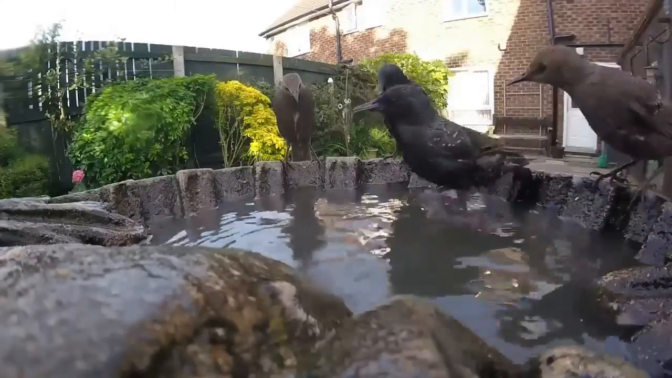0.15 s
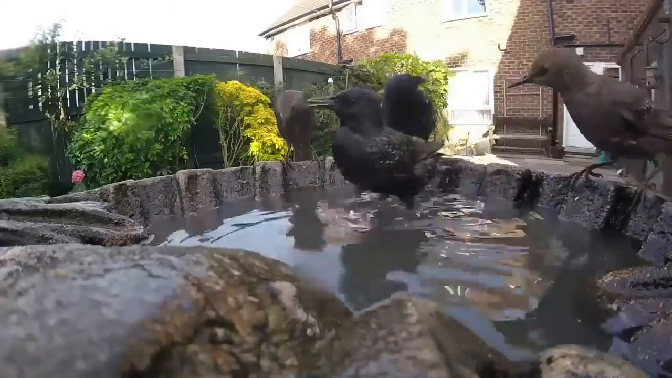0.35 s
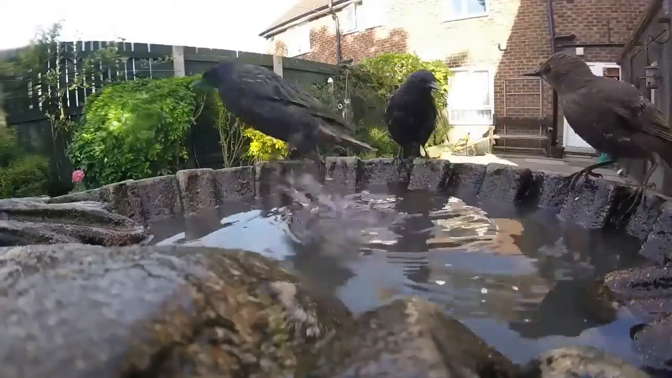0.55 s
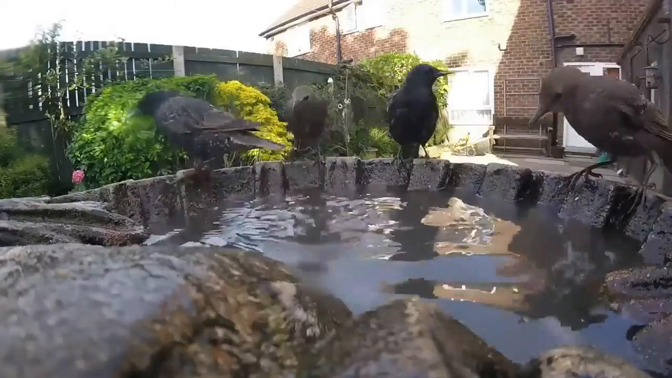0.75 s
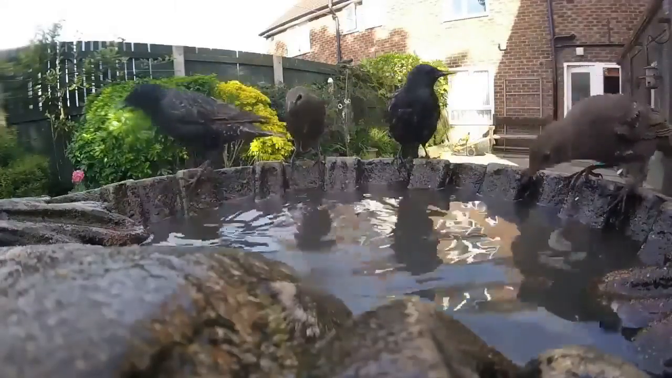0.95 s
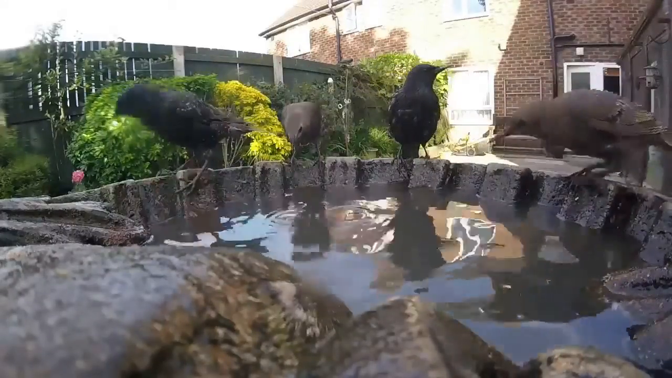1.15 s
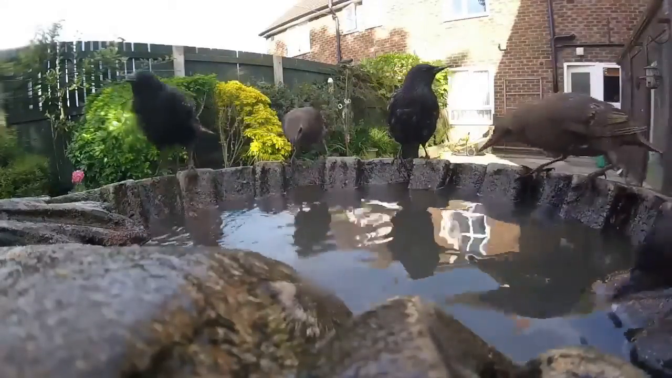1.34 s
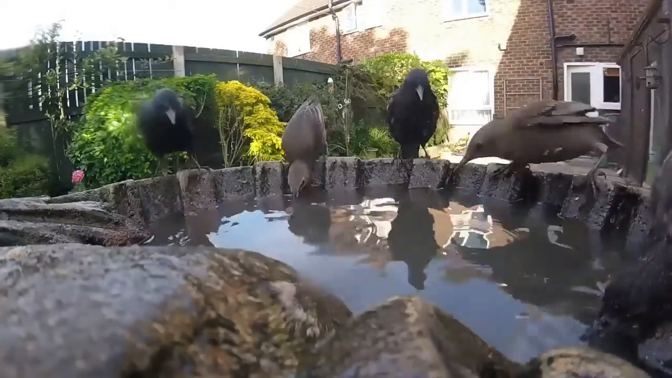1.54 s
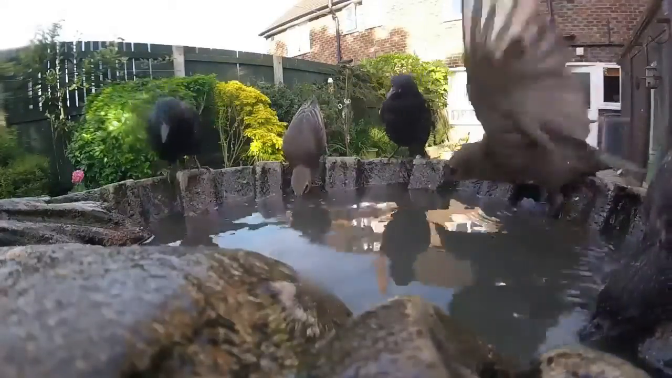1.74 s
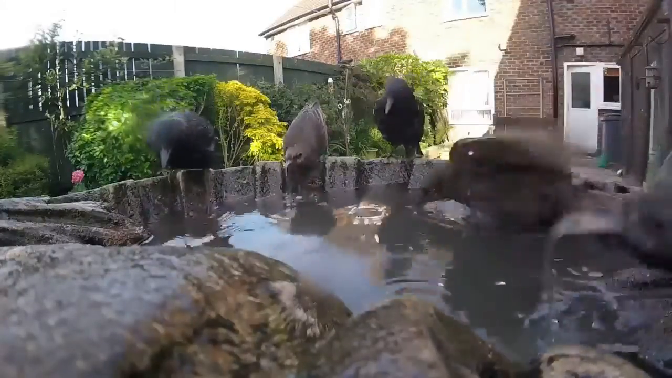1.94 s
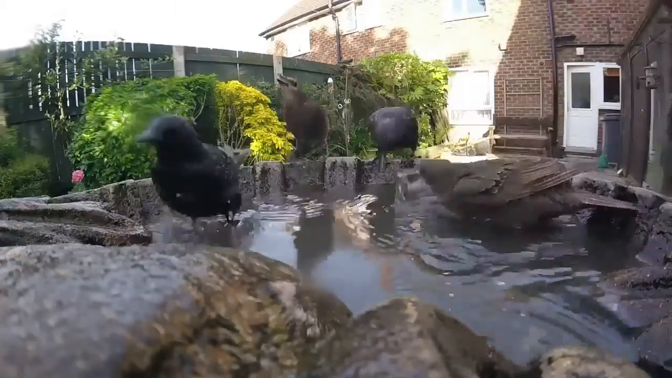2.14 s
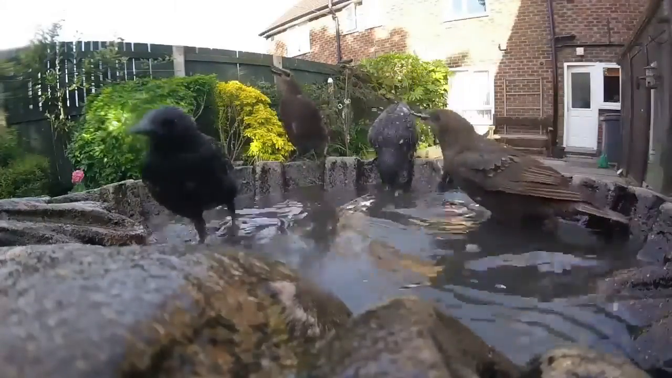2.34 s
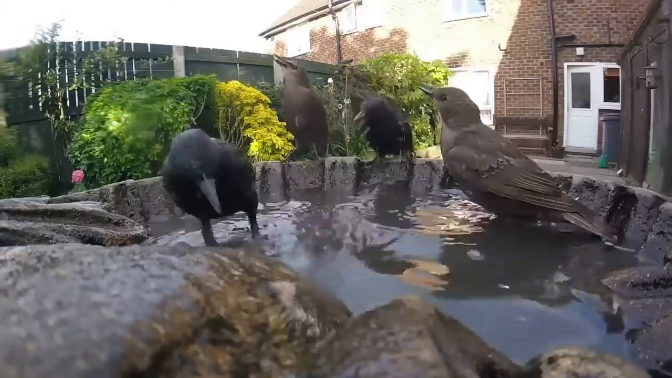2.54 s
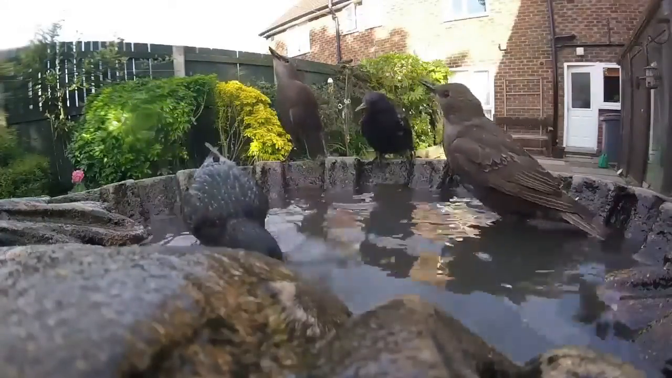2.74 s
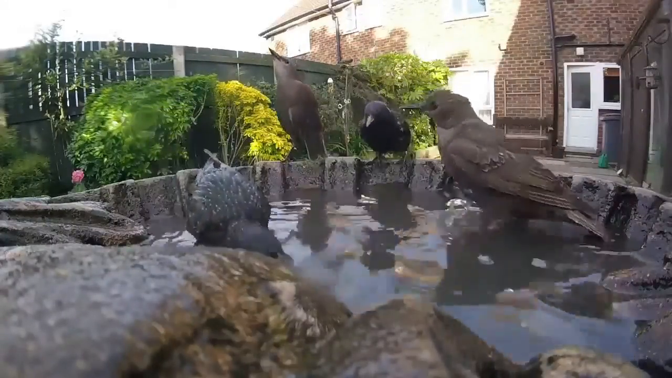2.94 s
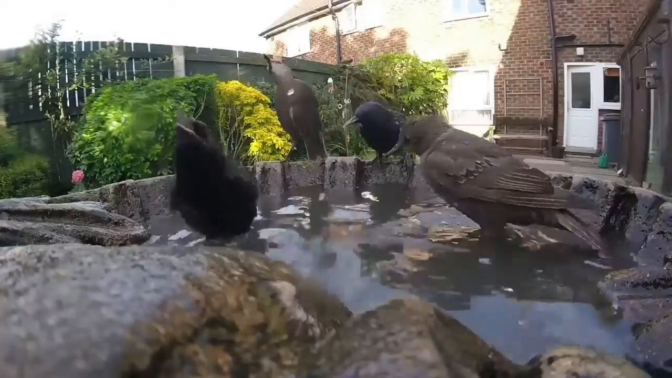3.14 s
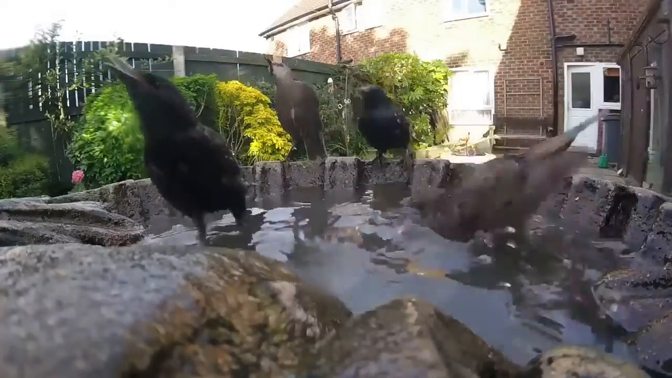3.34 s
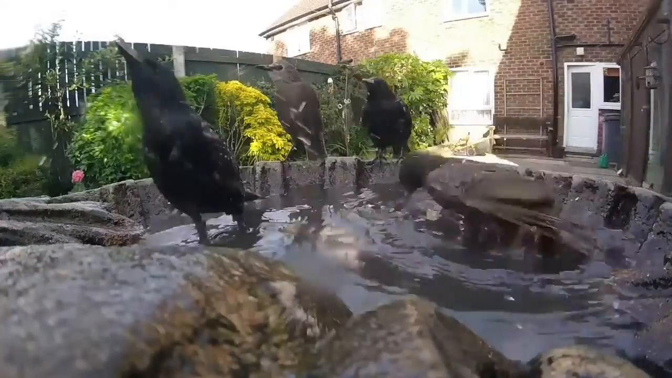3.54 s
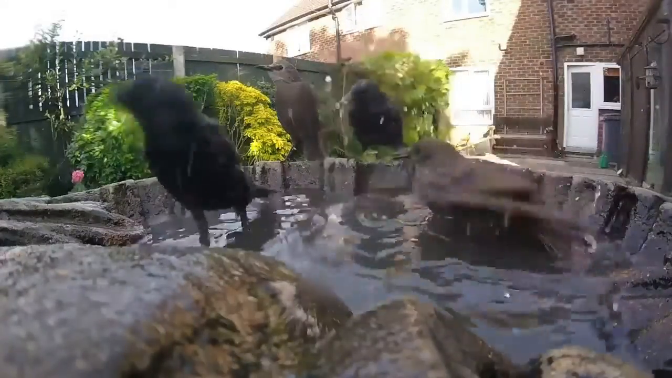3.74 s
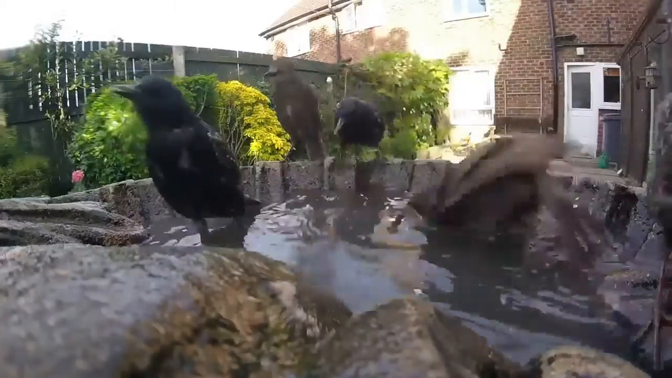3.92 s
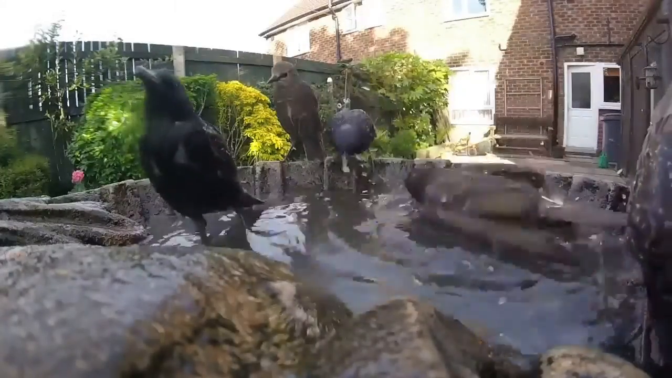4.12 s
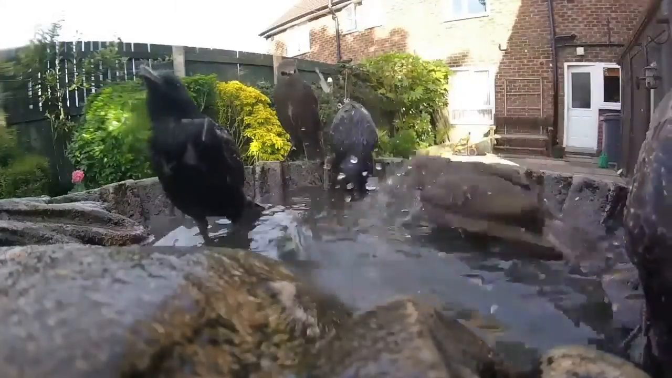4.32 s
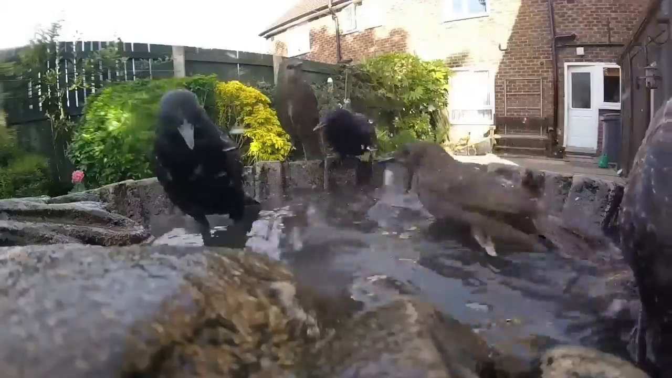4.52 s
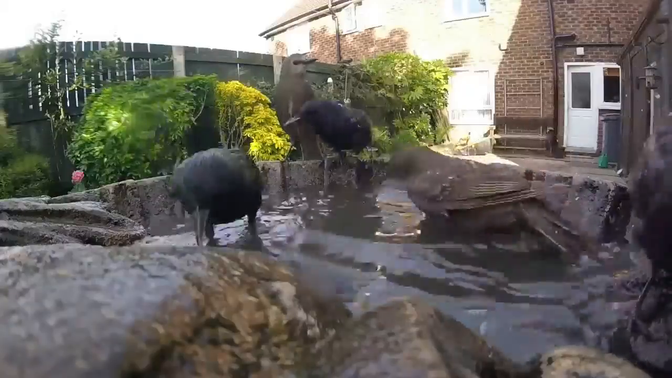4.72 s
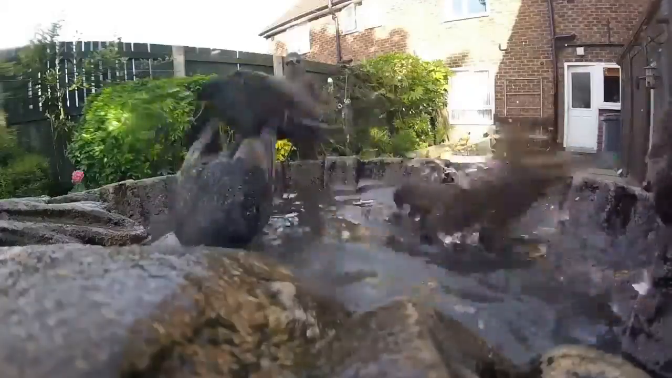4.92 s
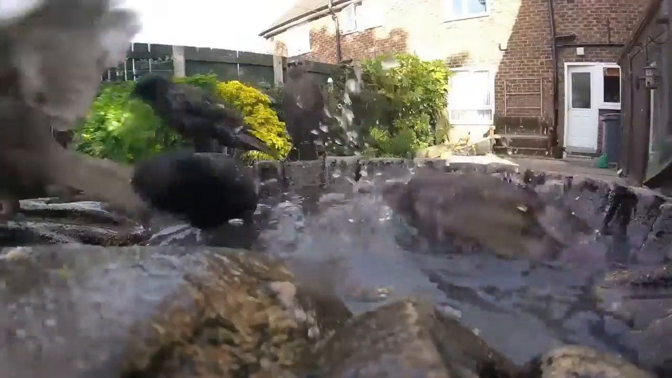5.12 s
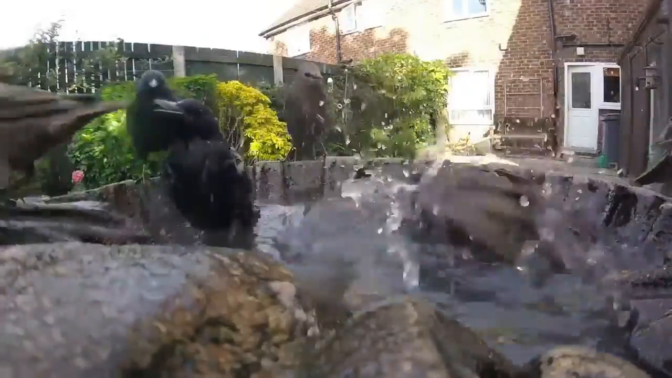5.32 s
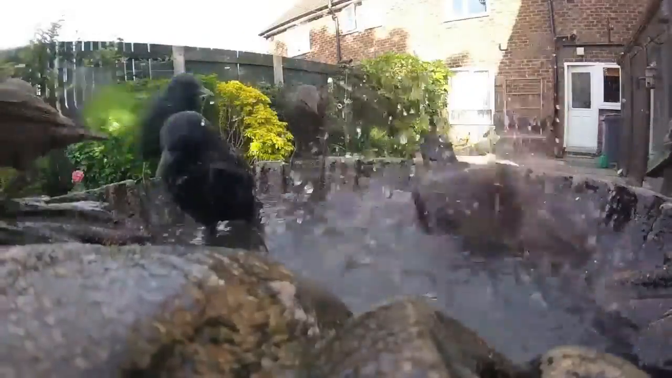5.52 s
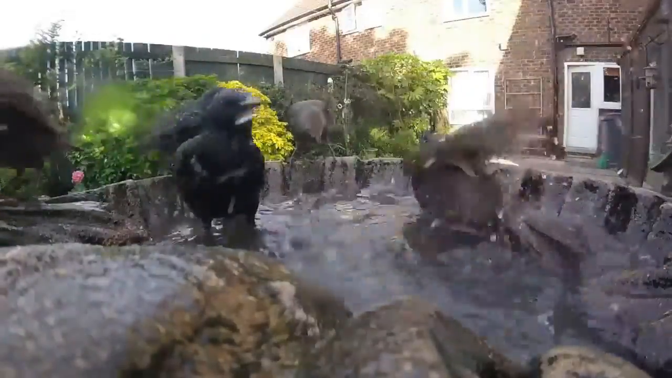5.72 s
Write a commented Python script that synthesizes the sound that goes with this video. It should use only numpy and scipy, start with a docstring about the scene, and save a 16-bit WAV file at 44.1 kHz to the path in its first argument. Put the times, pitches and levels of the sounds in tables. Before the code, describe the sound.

A close microphone in a small case sits at a shallow stone birdbath in a quiet garden. Soft low rumble, faint air and tiny high pings run throughout. Around 0.3-0.5 s a cluster of drips clicks and plops with a small bubble and a knock on the basin. It is then sparse, with faint distant whistles from 0.8 to 1.2 s and a sharp drip at 1.3. From 1.9 to 2.6 s drips thicken, with hollow plops, a rising bubble bloop near 2.4 and dull foot or beak knocks; another faint chirp follows. A feather shake sprays ticks and rustle at 3.5-3.9 s, another at 4.2-4.4 with crisp drops. From 5.0 s dense spray swells while hard wing strokes thump and bluster low, strongest around 5.1-5.25. After 5.6 s even, rapid, softer wing beats, about fourteen per second, flutter among bright splashy drops to the end.

```python
"""Starlings bathe in a shallow stone birdbath in a quiet garden, right beside a small cased microphone.
From the start soft noise and tiny pings sound; soon drips crack and ring their cavities, bubbles glide
in pitch, and knocks by feet and beaks excite the basin's modes. Far birds whistle faintly.
Later, shaken feathers throw spray, a mist of ticks, plinks and rustle, with stray drops.
Near the end a bird flaps hard: pressure pulses and eddy noise of its wing wash buffet the microphone."""
import sys
import numpy as np
from scipy import signal
from scipy.fft import rfft, irfft
from scipy.io import wavfile
from scipy.ndimage import uniform_filter1d

SR = 44100
rng = np.random.default_rng(int(sys.argv[2]) if len(sys.argv) > 2 else 0)


def master_out(mix):
    """Clip the mix to full scale and print it as 16-bit PCM to the path in sys.argv[1]."""
    frames = np.transpose(np.atleast_2d(mix))
    ceiling = np.clip(frames, -1, 1)
    pcm = np.round(ceiling * 32767).astype(np.int16)
    wavfile.write(sys.argv[1], SR, pcm)


N = 258867
T = np.arange(N) / SR   # time in seconds

# Noise spectra of the garden. Each row: frequency in Hz, relative level in dB.
RUMBLE = [(12, -38), (20, 2), (43, -1.5), (60, -11.5), (98, -6), (111, -17.5), (125, -16.5), (173, -25.5),
          (222, -23), (275, -27), (400, -35), (520, -50), (880, -120)]
AIR = [(150, -19), (300, 3.5), (500, 1.5), (1000, -1), (2000, -6.5), (3000, -9), (4000, -14), (5900, -11),
       (7500, -8.5), (9500, -13), (13500, 0.5), (15000, -83)]
RUMBLE_DB, AIR_DB = -43.5, -55   # rms levels

# Resonances of the microphone's case. Each row: frequency in Hz, bandwidth in Hz, gain in dB.
CASE = [(5290, 300, 5), (6460, 240, 0), (9430, 550, -1)]

# Clear drops and slaps on water. Each row: start in seconds, relative hardness in dB, cavity pitch in Hz,
# then the relative levels of cavity, crack and treble in dB.
DROPS = [(0.298, -23, 2990, -37, -39, -39), (0.31, -29.5, 4820, -29.5, -30.5, -49),
         (0.466, -43, 1910, -38.5, -59, -55), (0.492, -35, 3040, -29, -56, -47),
         (0.502, -35, 1590, -39, -35, -45), (1.281, -21, 2140, -42, -36.5, -38.5),
         (1.319, 8, 2200, -49.5, -42.5, -34), (1.913, -56, 4730, -32.5, -32, -44),
         (1.92, -38, 3970, -30, -30, -36), (1.989, -43, 4300, -32, -49, -66),
         (2.092, -35, 4730, -37.5, -58, -63), (2.106, -32, 1900, -33.5, -50, -52),
         (2.188, -44, 2280, -43.5, -42.5, -52), (2.236, -6, 1290, -38, -27, -42),
         (2.355, -36, 3570, -50, -47, -44), (2.383, -35, 1580, -39, -34, -56),
         (2.545, -9, 1090, -28, -30.5, -39), (3.01, -27, 2300, -33.5, -30, -57),
         (3.035, -41, 2450, -30.5, -48, -46.5), (3.555, -15, 2260, -40, -30.5, -39),
         (3.635, -37, 2670, -40, -33, -43), (3.669, -12, 4600, -52, -38, -42),
         (3.708, -23, 2350, -44, -32, -45), (3.715, -40, 3360, -33, -30, -40),
         (3.768, -28, 1390, -43, -36.5, -64), (3.784, -14, 2480, -31.5, -29.5, -41),
         (4.17, -30.5, 3440, -32, -35, -50), (4.205, -10, 4460, -44, -31.5, -50),
         (4.235, -46, 2200, -41, -25.5, -50), (4.259, -43, 2760, -37, -42, -51),
         (4.289, -11, 2730, -45, -37, -41.5), (4.31, -26, 1930, -39, -37, -53),
         (4.341, -30, 4770, -35.5, -45, -41.5), (4.401, -27, 1993, -34.5, -45, -54),
         (4.438, 0, 1930, -39, -39.5, -40.5), (4.499, -37, 3040, -33.5, -32, -71),
         (4.565, -28, 1020, -35.5, -35, -42), (4.824, -27, 1020, -39.5, -43.5, -49),
         (5.075, -12, 1800, -32.5, -27, -41), (5.247, -20, 1070, -35, -34, -55),
         (5.284, -51, 1700, -36, -49, -59), (5.317, -26, 2660, -43, -39, -37.5),
         (5.398, -38, 1360, -37, -27.5, -38), (5.476, -16, 1310, -44, -32, -43),
         (5.513, -17, 3690, -35.5, -26, -28.5), (5.559, -22, 980, -30.5, -28, -31.5),
         (5.619, -10, 1430, -23.5, -21, -39), (5.691, -4.5, 1820, -25.5, -23.5, -22),
         (5.762, -4, 2172, -34, -29, -39.5), (5.835, -8, 2140, -31, -33.5, -39),
         (5.845, -14, 4500, -57, -26.5, -30.5)]

# Large bubbles. Each row: start in seconds, starting level in dB, first pitch in Hz, last pitch in Hz,
# life in seconds, fade over that life in dB.
BUBBLES = [(0.312, -35, 609, 745, 0.046, 12), (0.399, -31.5, 5200, 5400, 0.006, 18),
           (0.444, -44.5, 2370, 2670, 0.013, 15), (0.484, -33, 1610, 1730, .018, 49),
           (0.611, -45.5, 1700, 2130, 0.026, 17), (1.739, -37, 1225, 1280, 0.015, 21),
           (1.9467, -23.5, 1550, 1410, 0.0083, 21), (1.9529, -27.5, 790, 1390, .014, -5),
           (2.238, -42, 1300, 1270, 0.032, 13), (2.238, -19.5, 3110, 2330, 0.0022, 16),
           (2.384, -29, 5340, 5400, 0.004, 15), (2.4025, -24.5, 545.5, 1980, 0.099, 23),
           (2.499, -34, 2660, 3020, 0.009, 18), (2.5472, -22, 715, 683, 0.03, 20),
           (3.087, -41, 5210, 5370, 0.017, 10), (3.196, -41.5, 5080, 5900, .012, 6),
           (3.233, -40, 1510, 1490, 0.0042, 9), (3.251, -40, 1230, 1260, 0.025, 16),
           (3.508, -33.5, 1950, 3900, 0.0076, -0.5), (4.806, -44, 1300, 1060, .025, 12),
           (5.203, -24, 3350, 4000, 0.0045, 12)]

# Knocks of feet and beaks on the basin. Each row: start in seconds, relative level in dB,
# attenuation of the modes above the lowest in dB.
KNOCKS = [(0.312, -30, 8.5), (0.506, -44.5, -6.5), (0.719, -41.5, 5.5), (1.428, -41.5, 8),
          (1.718, -44.5, 5), (2.237, -44, 2), (2.425, -24.5, 31), (2.548, -28.5, 9), (3.252, -57, -4),
          (3.499, -43.5, 7), (4.005, -36.5, 4), (5.028, -36.5, 10), (5.394, -42, 3), (5.765, -38.5, 2)]

# Modes of the water-filled basin. Each row: frequency in Hz, relative level in dB, 60 dB decay time in seconds.
BASIN = [(633.4, -2, 0.26), (880, -6.5, 0.093), (1233, 3, 0.034), (1512, -4.5, 0.071), (1990, -13, 0.079)]

# Whistles of far birds. Each row: start in seconds, length in seconds, first, middle and last pitch in Hz,
# level in dB.
CHIRPS = [(0.782, 0.048, 7460, 7900, 7900, -49.5), (0.905, 0.13, 2900, 2925, 2840, -57),
          (1.165, 0.077, 2720, 2560, 2630, -57.5), (1.8, 0.093, 5000, 4950, 4900, -55),
          (2.642, 0.12, 6800, 7270, 6830, -53), (2.672, 0.054, 3160, 2450, 2150, -56)]

# Spray-throwing shakes of the feathers. Each row: start of the hold in seconds, hold in seconds, level in dB.
SHAKES = [(3.523, 0.41, -54), (4.158, 0.22, -50.5), (4.995, 0.796, -50.5), (5.173, .38, -47)]
SHAKE_ATTACK_S, SHAKE_RELEASE_S = 0.099, 0.058

# Spectrum of the spray. Each row: frequency in Hz, relative level in dB.
SPRAY_COLOUR = [(300, -23), (800, 19.5), (1700, 14), (3000, 12.5), (4200, 14.5), (5300, 9.5), (7200, 8.5),
                (9500, 3.5), (15000, -50)]

# Wing strokes close to the microphone. Each row: centre in seconds, relative strength of the shove in dB,
# relative strength of the wake in dB.
STROKES = [(5.004, -20, -39), (5.08, -15, -42), (5.137, -9, -13), (5.178, -7, -16), (5.206, -22, -19),
           (5.224, -12, -29), (5.295, -30, -27), (5.381, -18, -29)]
WAKE_DELAY_S, WAKE_RISE_S, WAKE_DECAY_S = 0.0049, 0.0041, 0.017   # eddies trail each stroke

# Then the bather beats its wings evenly, farther away; each beat first dips the wing tips in the water.
BEAT_START_S, BEAT_PERIOD_S = 5.611, 0.072
BEAT_SHOVE_DB, BEAT_WAKE_DB = -27, -38
BEAT_SPRAY_DB, DIP_BEFORE_S, DIP_S = -48, 0.0098, 0.0032

# The draught swells as the flapping comes near and dies away after it.
DRAUGHT_PEAK_S, DRAUGHT_RISE_DB_PER_S, DRAUGHT_FALL_DB_PER_S = 5.211, 61.5, 71


def from_db(db):
    """Decibels are the logarithm of an amplitude ratio; this is the inverse."""
    return 10 ** (np.asarray(db) / 20)


def rms_one(x):
    """Normalization: divide by the root mean square."""
    return x / np.sqrt(np.mean(x ** 2) + 1e-20)


def add(out, s, sound):
    """Superposition: mix a sound in, starting at s seconds."""
    i = int(np.clip(round(s * SR), 0, N - 1))
    out[i:i + len(sound)] += sound[:N - i]


def noise():
    """White noise: equal power at all frequencies."""
    return rng.standard_normal(N)


def cut(x, hz, kind, order=2):
    """Butterworth filter: maximally flat in its passband."""
    hz = np.clip(hz, 10, 0.45 * SR)
    return signal.sosfilt(signal.butter(order, hz, kind, fs=SR, output="sos"), x)


def resonate(x, hz, width_hz):
    """Two-pole resonance: bandwidth sets the damping; the peak gain is 1."""
    r = np.exp(-np.pi * width_hz / SR)
    zeros = np.array([1, 0, -1]) * (1 - r * r) / 2
    poles = [1, -2 * r * np.cos(2 * np.pi * hz / SR), r * r]
    return signal.lfilter(zeros, poles, x + 1e-18)


def colour(x, spectrum):
    """Spectral shaping: weight each frequency by a smooth curve, at rms 1."""
    hz, db = np.transpose(spectrum)
    bins = np.maximum(np.fft.rfftfreq(N, 1 / SR), 1)
    gain_db = np.interp(np.log(bins), np.log(hz), db, left=-200, right=-200)
    return rms_one(irfft(rfft(x) * from_db(gain_db), N))


def steady(x, window_s):
    """Gain control: divide a noise by its running rms to even out slow swells."""
    return x / np.sqrt(uniform_filter1d(x * x, int(window_s * SR)) + 1e-9)


def swell(s, length, attack_s, release_s):
    """Exponential growth and decay: attack up to s, hold, release."""
    return np.exp(-np.maximum(s - T, 0) / attack_s - np.maximum(T - s - length, 0) / release_s)


def case(x, leak_db):
    """Parallel resonance: the case rings at its resonances and leaks the direct sound."""
    ringing = sum(from_db(db) * resonate(x, hz, width) for hz, width, db in CASE)
    return from_db(leak_db) * x + ringing


def plink(hz, cycles):
    """Damped oscillation: a tiny bubble of height about 1 swells in a cycle and dies in a few more."""
    turns = T[:int(5 * cycles / hz * SR)] * hz
    return 2 * (1 - np.exp(-turns)) * np.exp(-turns / cycles) * np.sin(2 * np.pi * turns)


def garden():
    """Filtered noise: distant rumble, soft air, and faint singing at basin and case resonances."""
    rumble = from_db(RUMBLE_DB) * colour(noise(), RUMBLE)
    air = from_db(AIR_DB) * colour(noise(), AIR)
    basin_hum = from_db(-64) * rms_one(resonate(noise(), BASIN[0][0], 6.2))
    case_hum = from_db(-69) * rms_one(resonate(noise(), CASE[0][0], 380))
    case_hum += from_db(-68) * rms_one(resonate(noise(), 6620, 180))
    return rumble + air + basin_hum + case_hum


def specks(count=85, centre_hz=5250, cycles=9):
    """Resonant excitation: now and then the tiniest drips ping near the case's lowest resonance."""
    faintest_db, spread_db = -57, 12   # before the case
    out = np.zeros(N)
    for at, size, pitch in rng.uniform(0, 1, size=(count, 3)):
        level = from_db(faintest_db + spread_db * size ** 3)
        add(out, at * T[-1], level * plink(centre_hz * 2 ** ((pitch - 0.5) / 3), cycles))
    return case(out, leak_db=-3)


def drop_impact(t, hardness):
    """Impact excitation: a surface brush, a noise burst with a snap at t = 0, then scattered droplets."""
    burst_s, rise_s, snap_db = 0.00081, 0.00033, 42
    brush_s, brush_db, patter_s, patter_db = 0.0022, -16, 0.0069, -20
    before, after = np.maximum(-t, 0), np.maximum(t, 0)
    white, droplets = rng.standard_normal((2, len(t)))
    brush = from_db(brush_db) * np.exp(-before / brush_s)
    patter = from_db(patter_db) * np.exp(-after / patter_s)
    hit = white * np.exp(-after / burst_s - before / rise_s)
    hit += np.where(t < 0, brush, patter) * droplets * np.abs(droplets)
    hit[int(-t[0] * SR)] += np.sqrt(from_db(hardness + snap_db))   # harder hits snap more sharply
    return hit


def drops(cavity_q=6, cavity_db=-12, crack_db=-13, treble_db=-12, contact_s=0.001011):
    """Cavity resonance: each impact rings a small cavity, cracks and spits treble through the case."""
    slap_db, slap_growth, usual_hardness_db = -1, 0.58, -24
    lead = 0.01   # seconds of brush before the hit
    out, t = np.zeros(N), T[:SR // 25] - lead
    for s, hardness, hz, cavity, crack, treble in list(DROPS) + stray_drops():
        hit = drop_impact(t, hardness)
        ring = rms_one(resonate(resonate(hit, hz, hz / cavity_q), hz, hz))
        slap = rms_one(cut(cut(hit, hz * 0.14, "high", order=1), 3700, "low", order=4))
        # harder hits add more of the broad slap
        slap *= from_db(slap_db + slap_growth * (hardness - usual_hardness_db))
        hollow = rms_one(ring + slap)
        sharp = rms_one(case(cut(hit, [4300, 7000], "band"), leak_db=-60))
        spit = rms_one(case(cut(hit, [7300, 11200], "band", order=3), leak_db=4.5))
        drop = from_db(cavity + cavity_db) * hollow + from_db(crack + crack_db) * sharp
        drop += from_db(treble + treble_db) * spit
        add(out, s + contact_s - lead, drop)
    return out


def trickle(below_db=-15, delay_s=0.012, early_s=0.0067, spread_db=-2, centre_hz=3400, cycles=3):
    """Bubble oscillation: water stirred around each listed drop makes four tiny plinks."""
    out = np.zeros(N)
    for s, _, _, cavity, crack, _ in DROPS:
        for _ in range(4):
            start = s - early_s + rng.exponential(delay_s)
            pitch, strength, ring = rng.uniform(-0.923, 1, size=3)
            level = from_db(max(cavity, crack) + below_db + spread_db * strength)
            add(out, start, level * plink(centre_hz * 2 ** pitch, cycles * 2 ** ring))
    return case(out, leak_db=5.5)


def bubbles(curve=1.8, overtone_db=-27, wobble_db=0.5):
    """Bubble resonance: a trapped bubble glides in pitch as it nears the surface, and stops when it bursts."""
    out = np.zeros(N)
    for s, db, first_hz, last_hz, life, fade_db in BUBBLES:
        age = T[:int(life * SR * 1.3)] / life
        hz = first_hz + (last_hz - first_hz) * age ** curve
        phase = 2 * np.pi * np.cumsum(hz) / SR
        wobble = rms_one(cut(rng.standard_normal(len(age)), 180, "low"))
        level = from_db(db - fade_db * age + wobble_db * wobble)
        level /= 1 + age ** 20   # the burst, at age 1
        add(out, s, level * (np.sin(phase) + from_db(overtone_db) * np.sin(2 * phase)))
    return out


def basin(onset_s=0.0013):
    """Modal vibration: every knock rings the basin's damped modes, each at a slightly random strength."""
    out, t = np.zeros(N), T[:SR // 2]
    for s, db, dull_db in KNOCKS:
        modes = np.zeros(len(t))
        for hz, level, t60 in BASIN:
            mode_db = db + level - dull_db * (hz > BASIN[0][0]) + rng.normal(0, 1)
            modes += from_db(mode_db - 60 * t / t60) * np.sin(2 * np.pi * hz * t)
        add(out, s, modes * (1 - np.exp(-t / onset_s)))
    return out


def far_birds():
    """Frequency modulation: thin whistles on curved pitch paths, jittered as if blurred by distance."""
    out = np.zeros(N)
    for s, length, first, middle, last, db in CHIRPS:
        u = np.linspace(0, 1, int(length * SR))
        hz = np.polyval(np.polyfit([0, 0.5, 1], [first, middle, last], 2), u)
        hz = hz * (1 + 0.03 * rms_one(cut(rng.standard_normal(len(u)), 400, "low")))
        add(out, s, from_db(db) * np.sin(np.pi * u) * np.sin(2 * np.pi * np.cumsum(hz) / SR))
    return out


def beat_times():
    """Periodicity: the bather's even wing beats come at equal intervals."""
    return np.arange(BEAT_START_S, T[-1], BEAT_PERIOD_S)


def shaking(dip_edge_s=0.0021):
    """Power addition: the spray strengths of all shakes and wing-tip dips add as squares."""
    shakes = [from_db(db) * swell(s, length, SHAKE_ATTACK_S, SHAKE_RELEASE_S) for s, length, db in SHAKES]
    dips = [from_db(BEAT_SPRAY_DB) * swell(s - DIP_BEFORE_S, DIP_S, dip_edge_s, dip_edge_s)
            for s in beat_times()]
    return np.linalg.norm(shakes + dips, axis=0)


def spray(per_s=480, spread_db=18, plinks_db=-5, mist_db=-8):
    """Granular noise: droplets tick on stone or plink into water, over a mist of feather rustle."""
    ticks, plinks = np.zeros(N), np.zeros(N)
    count = int(per_s * T[-1])   # of each kind
    splat = np.exp(-T[:SR // 200] / 0.0007)
    for at, size in rng.random((count, 2)):
        tick = splat * rng.standard_normal(len(splat))
        add(ticks, at * T[-1], from_db(spread_db * size ** 2) * tick)
    for at, size, pitch, ring in rng.random((count, 4)):
        drop = plink(1700 * 4.2 ** pitch, 2 + 7 * ring)
        add(plinks, at * T[-1], from_db(spread_db * size ** 2) * drop)
    grains = rms_one(ticks) + from_db(plinks_db) * rms_one(plinks) + from_db(mist_db) * noise()
    return shaking() * rms_one(case(colour(grains, SPRAY_COLOUR), leak_db=-5))


def stray_drops(per_s=32, cavity_db=1, crack_db=4, treble_db=-3, spread_db=3):
    """Random arrivals: smaller drops follow the spray's strength, a few much larger; rows as in DROPS."""
    hardness_db, largest_db = -19, 9
    rows, spray_db = [], 20 * np.log10(shaking() + 1e-9)
    offsets_db = np.array([cavity_db, crack_db, treble_db])
    for slot, (at, pitch, size, *shares) in enumerate(rng.uniform(-1, 1, size=(200, 6))):
        s = SHAKES[0][0] + (slot + at) / per_s
        drop_db = np.interp(s, T, spray_db) + largest_db * size ** 2
        levels = drop_db + offsets_db + spread_db * np.array(shares)
        rows.append((s, hardness_db, 2400 * 1.8 ** pitch, *levels))
    return [row for row in rows if row[0] < T[-1]]


def wing_wash(push_db=-19, draught_eddy_db=-31, buffet_db=-8, middle_db=-8, small_db=-7, stroke_s=0.0047):
    """Turbulence: moving air pushes slowly; the faster it goes, the smaller and brighter its eddies."""
    rise_db = DRAUGHT_RISE_DB_PER_S * (T - DRAUGHT_PEAK_S)
    fall_db = DRAUGHT_FALL_DB_PER_S * (DRAUGHT_PEAK_S - T)
    draught = from_db(np.minimum(rise_db, fall_db))
    beats = [(s, BEAT_SHOVE_DB, BEAT_WAKE_DB) for s in beat_times()]
    slow = steady(cut(noise(), [20, 55], "band"), window_s=0.06)
    buffet = steady(cut(noise(), [70, 150], "band"), window_s=0.04)
    large = steady(cut(cut(noise(), [105, 200], "band"), 400, "low"), window_s=0.03)
    middle = steady(cut(cut(noise(), [240, 420], "band"), 620, "low"), window_s=0.025)
    small = steady(cut(cut(noise(), [340, 680], "band"), 950, "low"), window_s=0.02)
    out = from_db(push_db) * draught * slow
    strength = from_db(draught_eddy_db) * draught
    for at, shove_db, wake_db in list(STROKES) + beats:
        u = (T - at) / stroke_s
        out += from_db(shove_db) * u * np.exp(-u * u / 2)   # suction, then pressure
        wake = from_db(wake_db) * swell(at + WAKE_DELAY_S, 0, WAKE_RISE_S, WAKE_DECAY_S)
        strength = np.hypot(strength, wake)
    fast = strength ** 2 / (strength ** 2 + from_db(-21) ** 2)   # share of small eddies, 0 to 1
    eddies = large + from_db(buffet_db) * buffet + from_db(middle_db) * middle
    eddies += from_db(small_db) * fast * small
    return out + strength * eddies


def scene():
    """Superposition: the garden behind, water close by, and wings."""
    background = garden() + far_birds()
    water = specks() + drops() + trickle() + bubbles() + basin() + spray()
    return (background + water + wing_wash())[None]


def record(dry):
    """Low-pass filtering: the case muffles the highest treble, and the top is cut."""
    muffled = cut(dry, 10000, "low", order=20) + from_db(-18) * cut(dry, 10400, "high", order=10)
    top_cut = signal.cheby2(12, 60, 15500, fs=SR, output="sos")   # 60 dB down from 15500 Hz up
    return signal.sosfilt(top_cut, muffled)


dry = scene()
out = record(dry)
master_out(out)
```